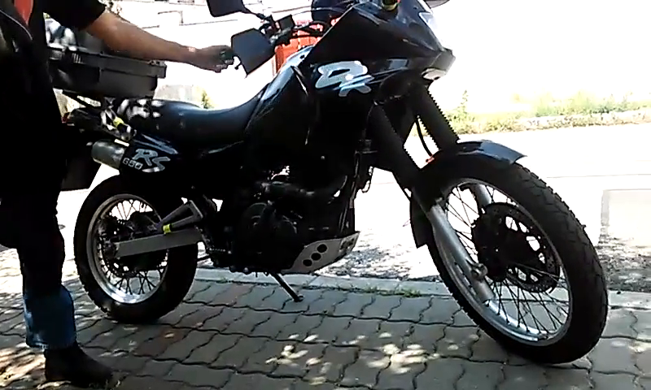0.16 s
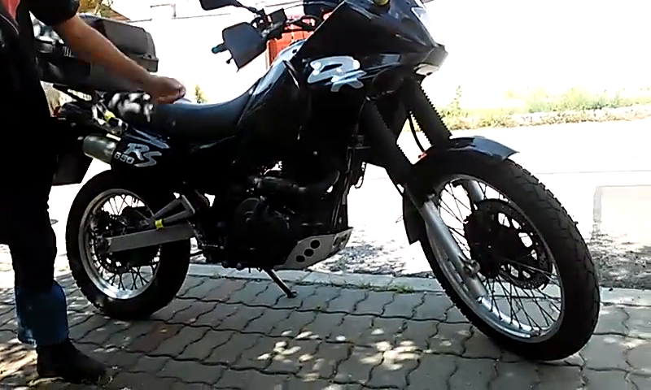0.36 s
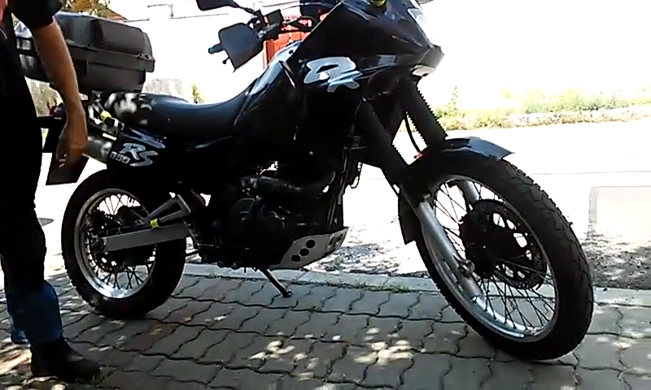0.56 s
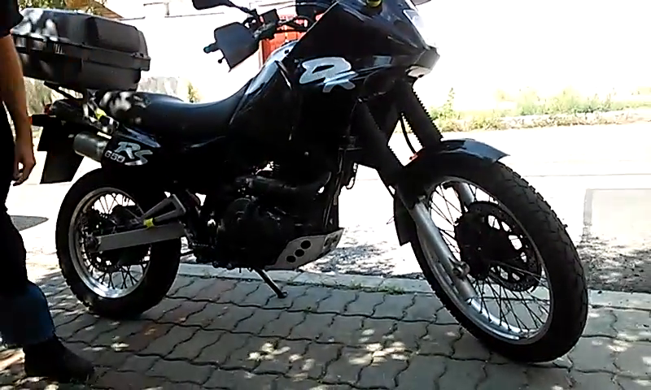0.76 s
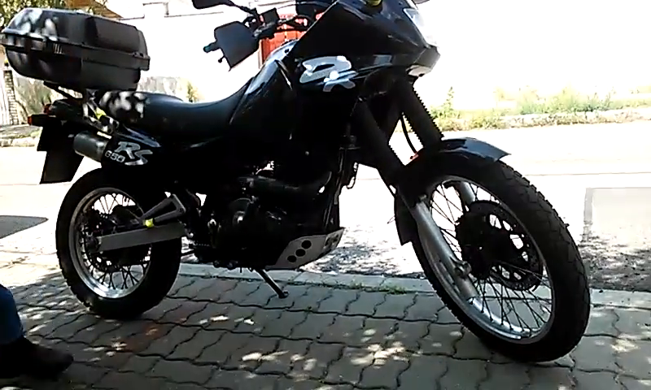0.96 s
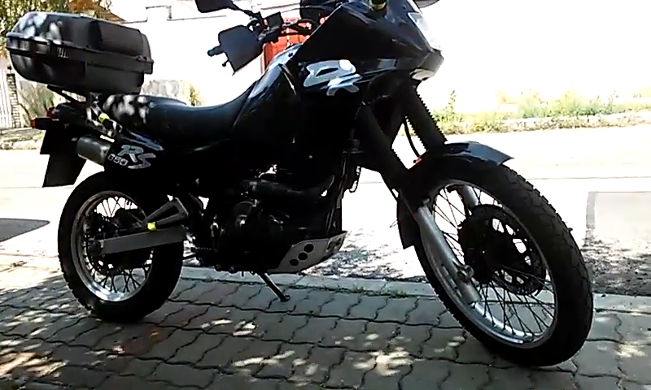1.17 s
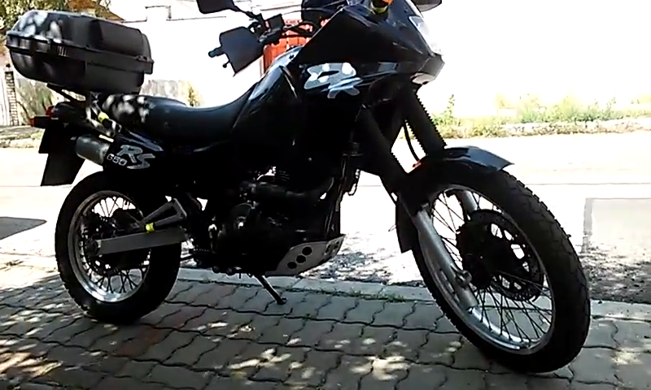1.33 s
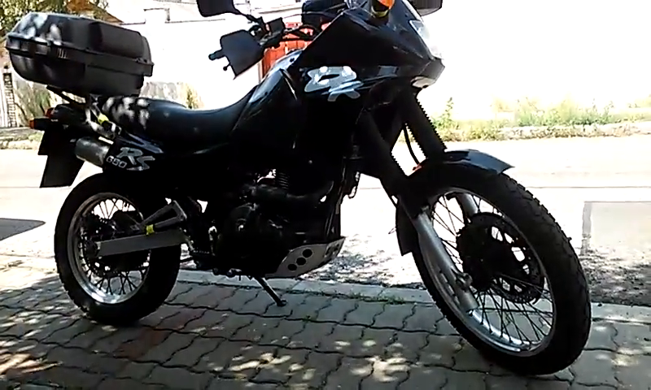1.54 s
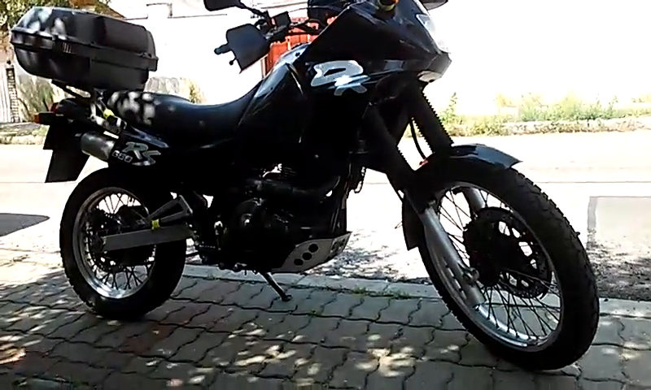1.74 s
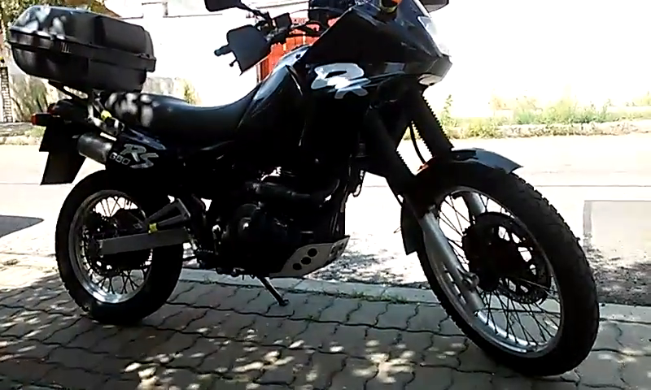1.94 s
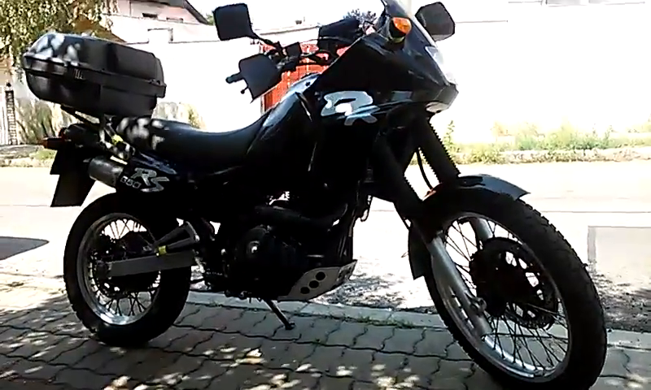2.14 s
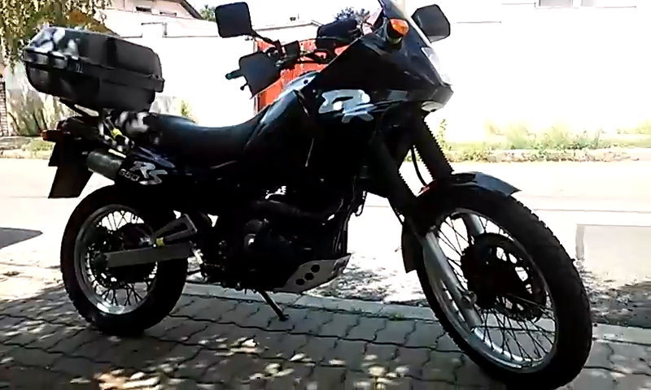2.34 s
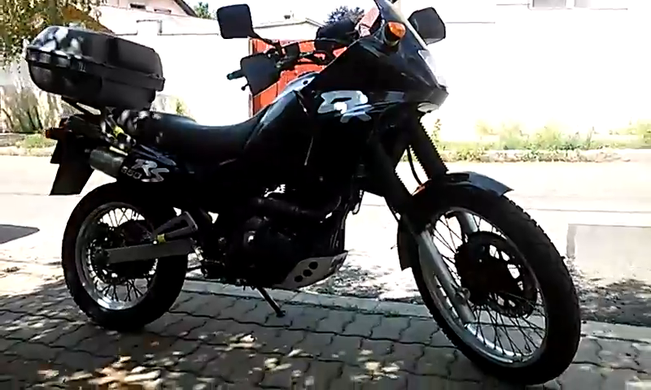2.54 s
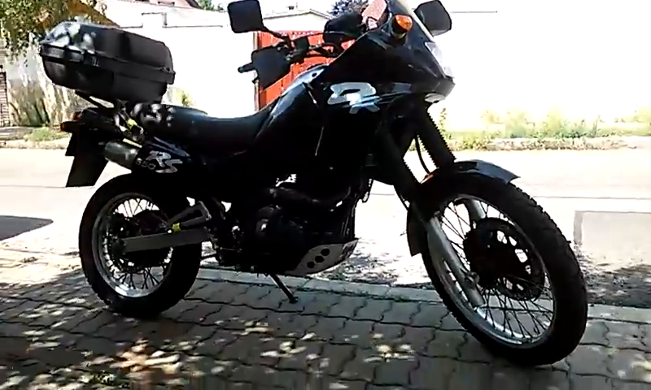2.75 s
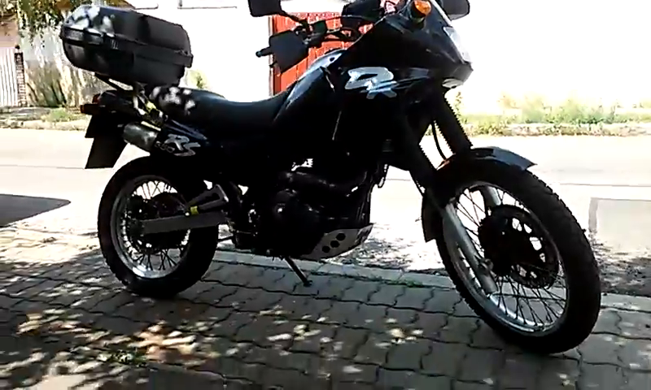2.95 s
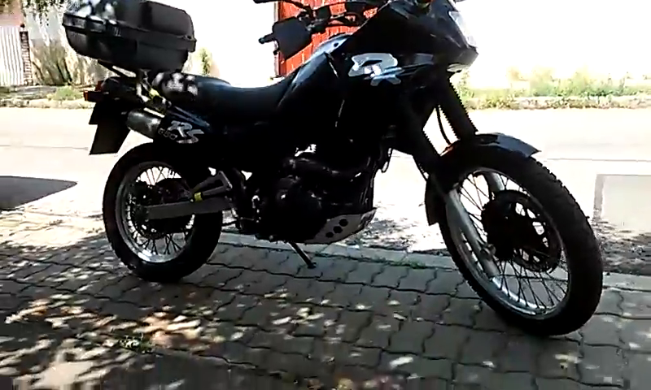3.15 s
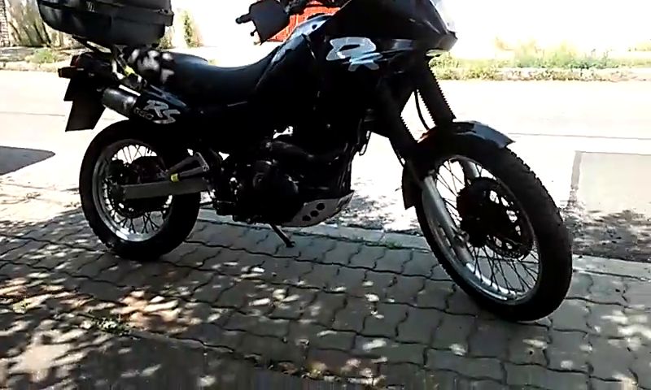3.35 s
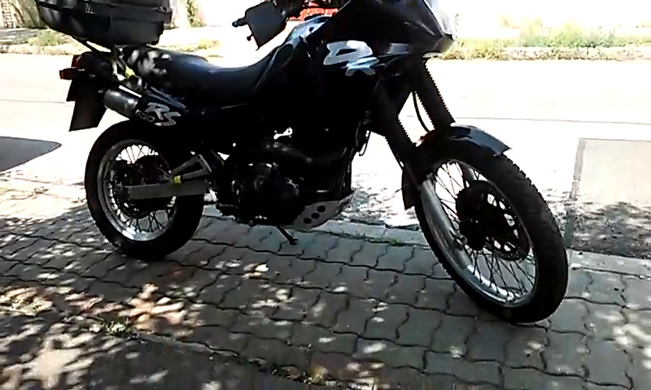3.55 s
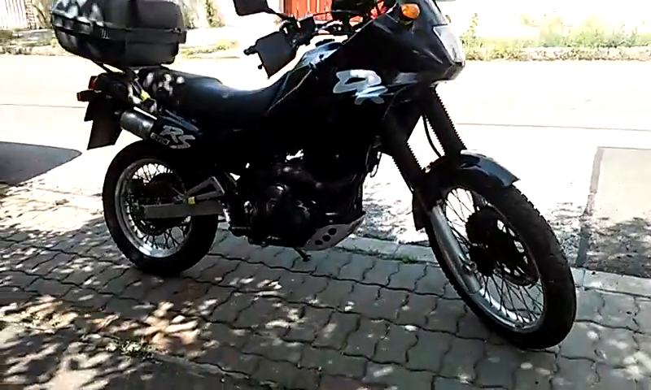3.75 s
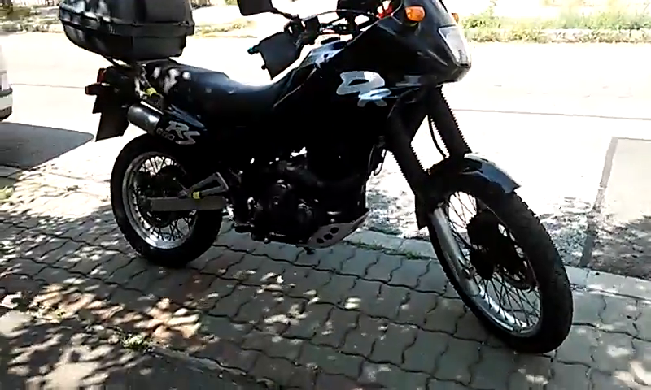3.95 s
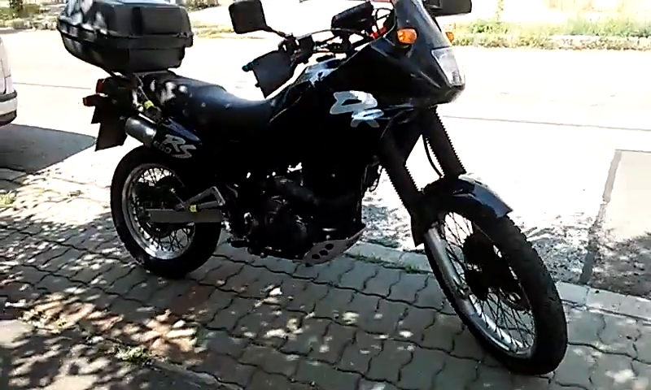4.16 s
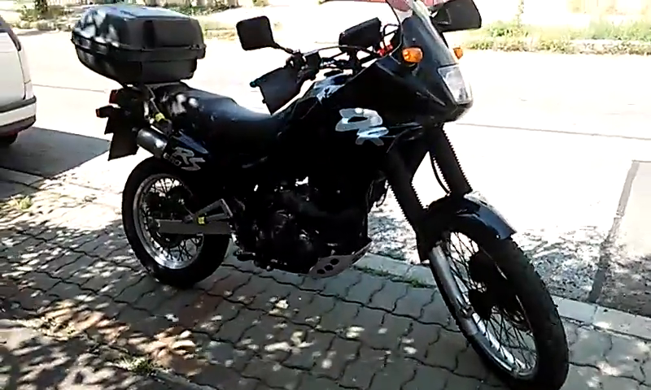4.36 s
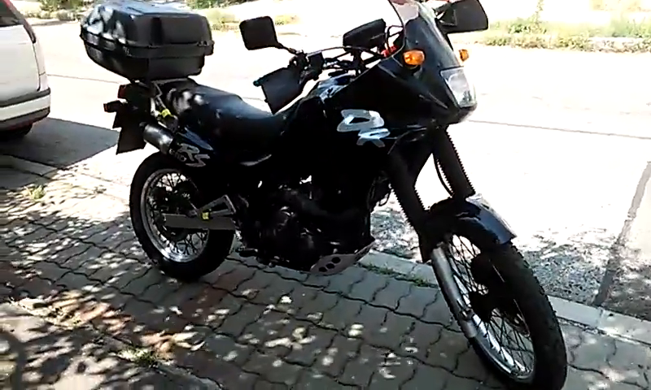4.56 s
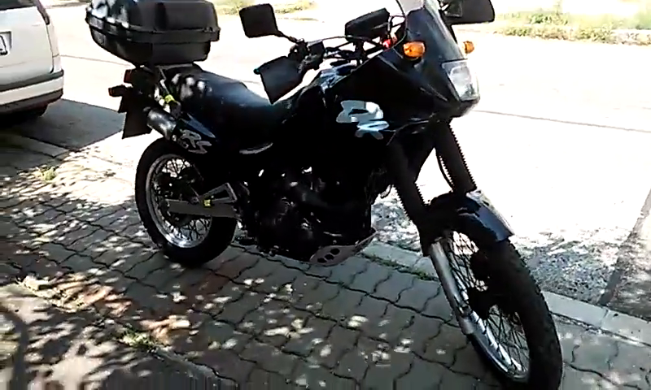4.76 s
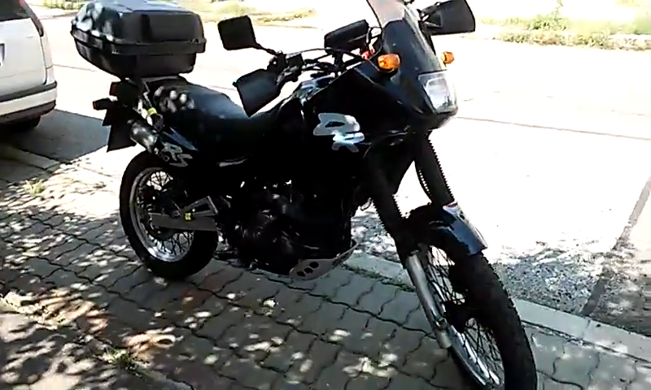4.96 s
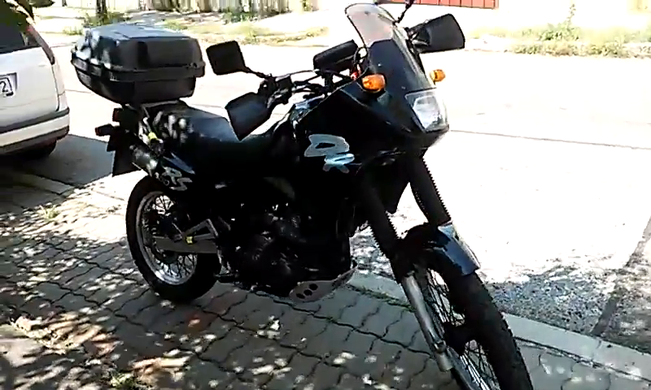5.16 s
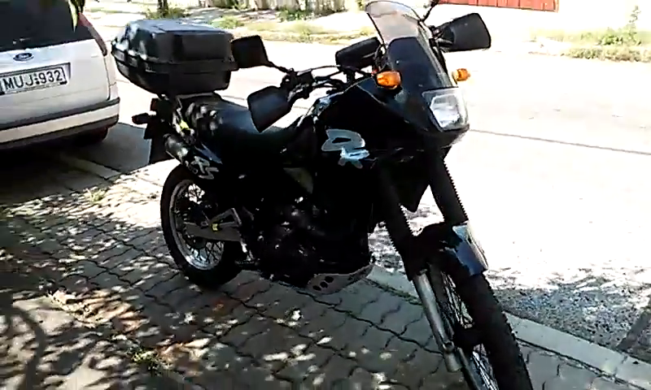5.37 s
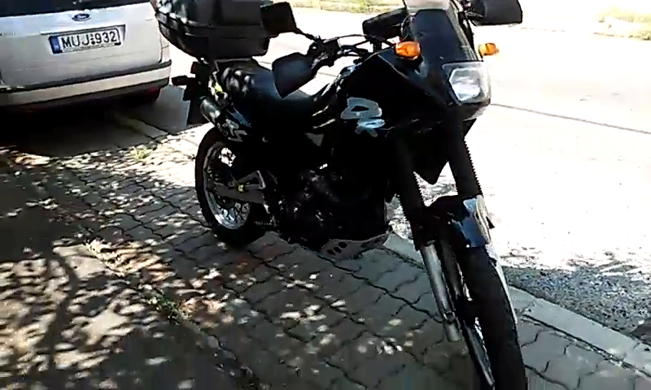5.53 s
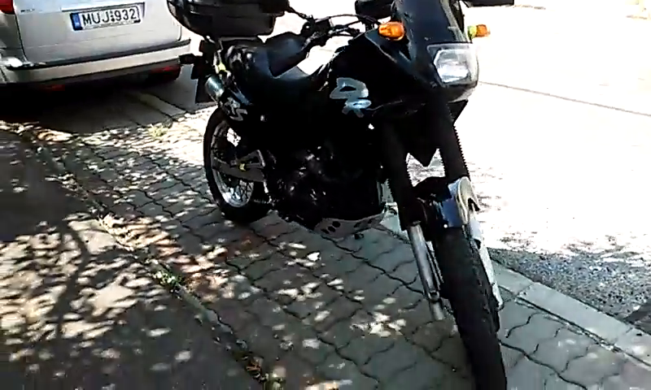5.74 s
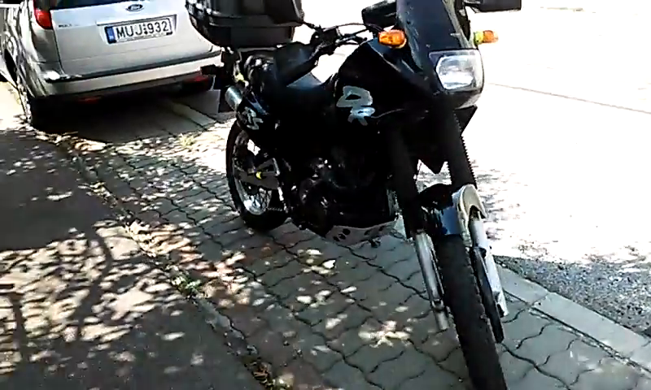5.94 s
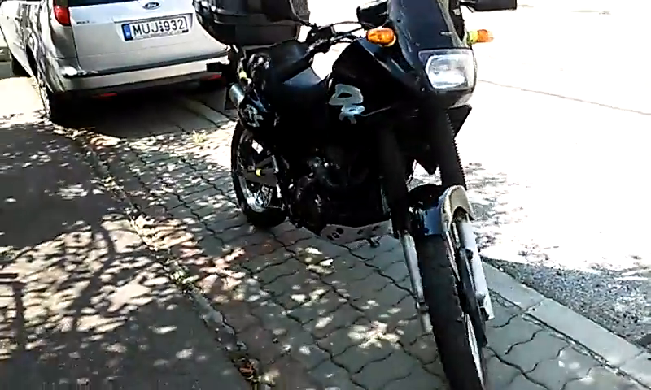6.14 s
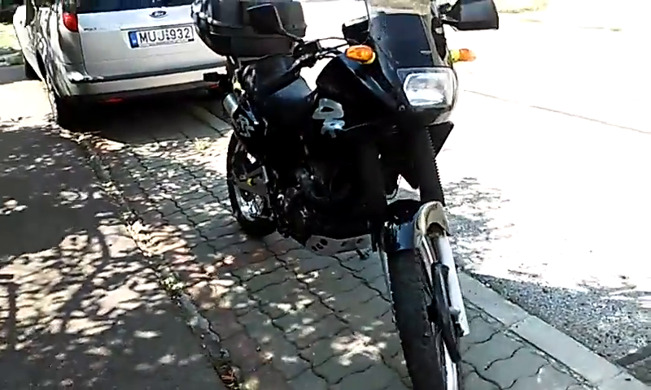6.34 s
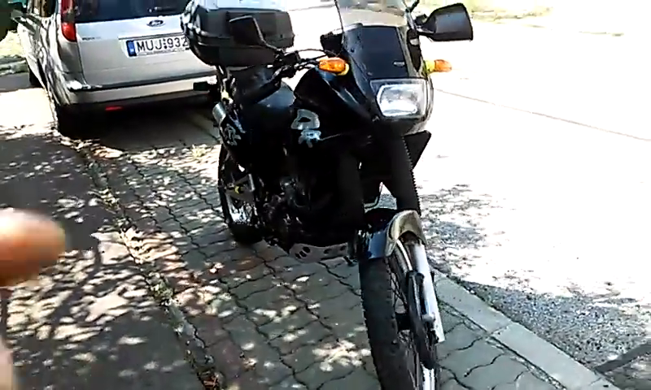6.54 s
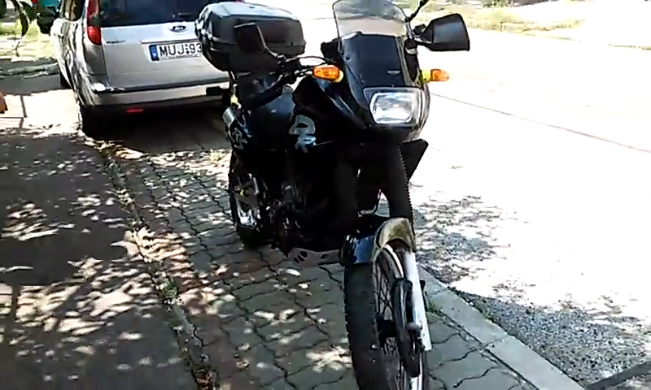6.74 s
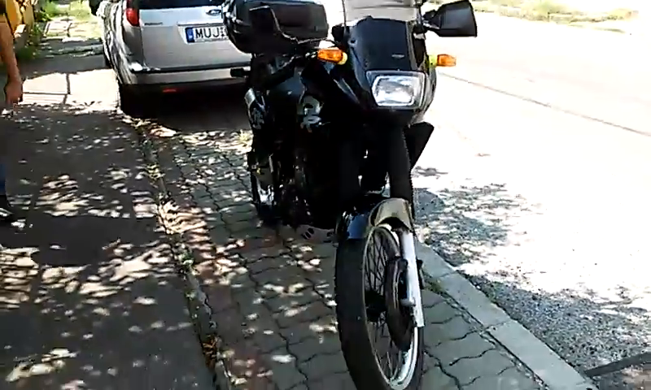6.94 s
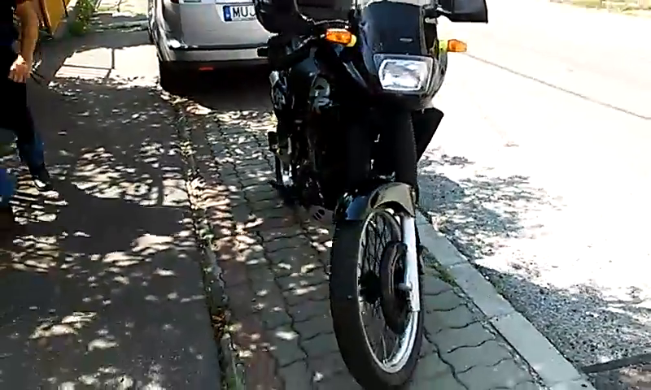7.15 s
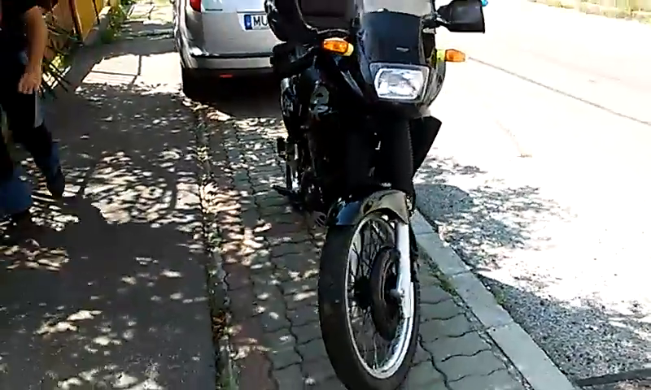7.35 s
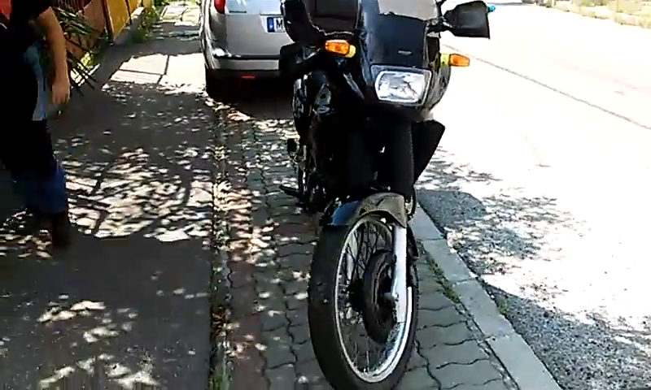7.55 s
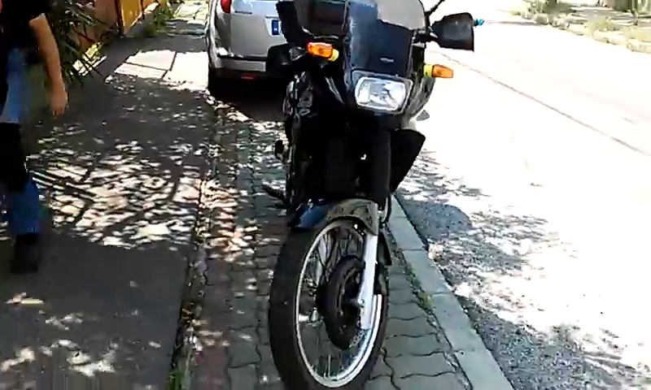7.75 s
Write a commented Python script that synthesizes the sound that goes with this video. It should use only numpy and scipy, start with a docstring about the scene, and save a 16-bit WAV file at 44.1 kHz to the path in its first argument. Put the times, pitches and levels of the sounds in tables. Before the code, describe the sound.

A loud, rough throttle blip opens at once, booms as the throttle shuts, and falls within about a second and a half to a slow single-cylinder idle. Uneven exhaust thumps carry metallic clatter, buzzing covers and small sharp ticks. The close outdoor microphone moves from the motorcycle's flank to its front wheel, so the tone shifts gradually, over faint distant traffic.

```python
"""A throttle blip blares, then a single-cylinder motorcycle falls to idle on a paved street.
Superposition: each firing sends swelling notes down the exhaust and shakes clatter out of the engine cases,
as noise filtered by the metal and as knocked resonators. Tones locked to the engine, ticks, whirrs, a thud
and a far murmur add to it. The microphone walks from the flank to the front wheel; a ground echo combs
the cases and ticks, and its delay shortens late in the walk."""
import sys
import numpy as np
from scipy import signal
from scipy.fft import rfft, irfft, next_fast_len
from scipy.io import wavfile
from scipy.ndimage import uniform_filter1d

SR = 44100
rng = np.random.default_rng(int(sys.argv[2]) if len(sys.argv) > 2 else 0)


def waveform_to_disk(signal):
    """Save audio, clipped to [-1, 1], as 16-bit WAV at the path in sys.argv[1]."""
    frames = np.transpose(np.atleast_2d(signal))
    scaled = np.clip(frames, -1, 1) * 32767
    samples = np.round(scaled).astype(np.int16)
    wavfile.write(sys.argv[1], SR, samples)


N = 343980
T = np.arange(N) / SR  # time of every sample, t/s

# Engine speed; the blip dies away, then the idle hunts a little. Columns: t/s, firing rate f/Hz
FIRING_RATE = [(0.0, 37.9), (0.12, 39.8), (0.25, 34.8), (0.5, 28.8), (0.9, 20.64), (1.3, 17.15),
               (1.7, 15.49), (2.0, 15.31), (2.3, 15.02), (2.6, 15.12), (3.0, 15.27), (3.3, 15.01),
               (3.8, 15.03), (4.8, 14.98), (5.3, 14.58), (6.0, 15.32), (6.4, 14.73), (6.7, 15.33),
               (7.2, 14.96), (7.8, 15.88)]
# Course of throttle and microphone. Columns: t/s, place
# (0 throttle open, 1 throttle shut, 2 flank, 3 shoulder, 4 corner, 5 front wheel)
PLACE_PATH = [(.15, -0.5), (.2, 1), (.9, 1.5), (1.3, 2), (3.1, 3), (3.8, 3), (4.5, 4), (5.5, 4.5),
              (6.1, 4.5)]
# Bursts within one firing, timed for cycles of 50 ms or more.
# Columns: f/Hz, deepest trough after the firing t/ms, rise t/ms, fall t/ms
EXHAUST_BURSTS = [(104, -14.5, 13, 9), (154, 0, 8.5, 11.5), (190, -22, 4, 6), (235, -.5, 8, 4),
                  (280, -20, 5, 7), (275, 4, 8, 16), (350, -18, 6, 12), (420, -17, 5, 9), (424, 5, 16, 28),
                  (1035, -7, 6, 7), (540, -2, 6, 9), (690, -20.7, 2, 6), (905, -20.7, 2, 6),
                  (730, 1, 6, 3.5), (905, 1, 6, 3.5)]
# Strength of each burst, one row a burst. Columns: level/dB at places 0 to 5
BURST_LEVELS = [(-17, -21, -8, -6.5, -2, -2.5), (-16, 1.5, -1, 2.5, 3, -1.5), (1, -3.5, -7, -6.5, -49, 5),
                (-28, -12, -9, -8.5, -13, 6.5), (-17, -11.5, -8.5, -29, -10.5, -4.5),
                (-7.5, -9, -26, -39, -11.5, -24), (-9, -32, -65, -15.5, -3.5, -4),
                (-4, -39, -25, -28, -6, -1), (-8, -17, -28.5, -20.5, -10, -5), (-25, -19, -20, -14, -6, -8),
                (-13, -16, -21, -19, -16, -3), (-6, -10, -5, -5.5, -0.5, -55),
                (-22, -22, -18, -7.5, -22, -20), (-5, -14, -2.5, -18, -32, -25),
                (-18, -28, -11, -2, -9, -20)]
# Pitch of the upper bursts: it jumps as the revs settle, then slides down. Columns: t/s, ratio
UPPER_BURST_PITCH = [(1.15, 0.92), (1.25, 1.07), (1.95, 0.9695)]
# Exhaust loudness; it booms while the throttle is shut, then sags. Columns: t/s, level/dB
EXHAUST_LEVEL = [(0, -27.5), (.15, -23.5), (.2, -15), (.35, -17.5), (.56, -18.5), (.63, -26.5),
                 (.92, -29.5), (1.05, -43), (1.15, -29), (1.7, -28.5), (2.5, -24), (3.8, -25.5),
                 (5.24, -31.5), (5.6, -29), (6.68, -31), (7.42, -30), (7.6, -29)]
# Clean engine tones. Key: multiple of the firing rate. Columns: t/s, level/dB
ENGINE_TONES = {5: [(0, -18), (.12, -24), (.21, -62)], 18: [(5.2, -48), (6.05, -34), (6.4, -43),
                (7.05, -36), (7.4, -35), (7.8, -59)]}
# Noise of the cases: rumble, clatter, rattle, hiss. Columns: low f/Hz, high f/Hz (at most half of SR),
# offset level/dB, throb level/dB, throb peak/cycle, tick share of power (0-1)
NOISE_LAYERS = [(186, 930, 4, 2, -0.035, 0.04), (796, 4900, -5, 4, -0.3, 0.24),
                (4140, 6560, -9, 1, -0.2, 0.16), (6330, 31000, 1, 5, -0.1, 0.09)]
# Broad spectral density of the engine metal. Columns: f/Hz, relative level/dB per Hz
METAL_COLOUR = [(88, -31), (150, -3.5), (297, -7), (415, -4), (494, -0.5), (907, -19.5), (1190, -15.5),
                (1830, -11), (3300, -16), (5370, -18.5), (6790, -26.5), (8800, -36.5), (16100, -45)]
# Resonances of thin fins in the treble. Columns: f/Hz, width f/Hz, gain over the colour level/dB
FIN_RESONANCES = [(7790, 160, 5), (10800, 120, 4.5), (12770, 510, 3.5), (14300, 500, 7)]
# Growth of each noisy layer with the revs. Columns: gain level/dB, start and full firing rate f/Hz
REV_GROWTH = {"rumble": (22.5, 17.8, 43), "clatter": (21.6, 18.76, 33.1), "rattle": (26.2, 17.6, 37.9),
              "hiss": (18.2, 17.3, 32.5)}
# Idle loudness of rumble, clatter and hiss. Columns: level/dB at flank, shoulder, corner, front wheel
IDLE_LEVELS = {"rumble": (-45, -44.5, -42, -36), "clatter": (-31.5, -28.5, -27, -29.5),
               "hiss": (-45.5, -43.5, -45.5, -47)}
# Idle loudness of the treble rattle. Columns: t/s, level/dB
RATTLE_LEVEL = [(1.7, -34), (2.7, -32), (3.08, -28), (3.6, -29), (4.52, -33), (4.88, -28), (5.3, -33.5),
                (5.96, -26), (6.7, -31), (7.04, -35), (7.8, -37.5)]
# The microphone backs away at the end. Columns: t/s, distance/m
MICROPHONE_DISTANCE = [(6.1, 0.83), (7.1, 1.24), (7.8, 1.24)]
# Firings that stand out, hard or feeble. Columns: t/s, level/dB before the layer's share
ODD_FIRINGS_DB = [(1.099, -2), (1.321, 2.5), (1.625, 2), (3.136, -3.5), (4.867, 1.5), (5.206, 2),
                  (6.677, 4), (7.138, -3), (7.271, -3.5), (7.663, -1)]
# Factor on the odd firings, by layer [ratio]
ODD_FIRING_SHARE = {"rumble": 0.28, "clatter": 0.7, "rattle": 1, "hiss": 1.8}
# Valve-gear knocks, two a cycle. Columns: place/cycle, jump level/dB and dying time/cycle,
# scatter level/dB; levels are for idle, before the layer's share
VALVE_KNOCKS = [(-.44, 5, 0.089, 4), (-.04, 5.5, 0.17, 4.5)]
# Factor on the valve knocks, by layer [ratio]
VALVE_KNOCK_SHARE = {"rumble": 0, "clatter": 0.56, "rattle": 1, "hiss": 0.45}
# Resonant covers and panels, each loudest where it faces the microphone.
# Columns: f/Hz, nominal width f/Hz (widened in ringing), level/dB against the clatter at places 0 to 5
PANEL_RINGS = [(757, 69, -9.5, -15, -10.5, -6, -20.5, -59), (911, 68, -17.5, -31, -6, -18, -4, -20.5),
               (1038, 92, -23, -23, -11.5, -16, -8.5, -5.5), (1318, 96, -34, -20, -22, -6, -23, -5),
               (1498, 104, -11.5, -7.5, -5, -14, -33, -38), (1633, 29, -10, -10.5, -13, -41, -33, -7.5),
               (1812, 88, -5, -5.5, -4, -7, -3.5, -21.5), (2037, 113, -8, -10, -54, -5, -7, -11),
               (2160, 50, -24, -48, -39, -19, -11, -7), (2363, 114, -4.5, -8.5, -9, -16.5, -10, -10.5),
               (2654, 194, -8.5, -13, -9, -7.5, -10.5, -37), (3096, 31, -13, -22, -21, -40, -40, -21.5),
               (3757, 61, -11, -20, -15.5, -16, -23, -31)]
# Small covers that buzz. Columns: as PANEL_RINGS, with level/dB against the rattle
BUZZING_COVERS = [(4774, 190, -7, -7.5, -4, -8.5, -13.5, -12), (5110, 76, -8, -8.5, -12.5, -7.5, -43, -4.5),
                  (5506, 110, -9.5, -9, -6, -17, -11.5, -7.5), (5746, 79, -18, -16, -14, -10.5, -9.5, -14),
                  (5280, 150, -12, -8.5, -6.5, -8, -8, -9.5)]
# Pitch of the buzzing covers: it sinks, then leaps as the microphone rounds the tank. Columns: t/s, ratio
COVER_PITCH = [(2.65, 1.04), (2.85, 0.99), (3.15, 1.01), (3.25, 1.05), (4.2, 0.99)]
# Echo by the paving. Columns: t/s, extra path t/ms, strength (0-1)
PAVING_ECHO = [(1.2, 0.91, 0.42), (3.5, 0.91, 0.63), (4.3, 0.97, 0), (5.0, 0.82, 0.34), (7.8, 0.33, 0.01)]
# Sharp metallic ticks. Columns: t/s, level/dB, f/Hz
METAL_TICKS = [(0.8407, -12.5, 5600), (1.191, -22.5, 950), (1.731, -24, 1960), (1.803, -17.5, 2040),
               (2.6622, -13.5, 2550), (3.1742, -24, 1950), (3.5063, -16.5, 2690), (4.303, -22, 1720),
               (4.371, -16, 1836), (4.862, -15, 5400), (6.1768, -13.5, 5380), (6.4727, -17, 5370),
               (7.0377, -16, 1665), (7.502, -22, 2040)]
# Singing narrow bands, by name: width f/Hz, then a path. Columns of the path: t/s, f/Hz, level/dB
SINGING_BANDS = {"whirr at the corner": (69, [(3.7, 1870, -43), (4.0, 1838, -29.5), (4.3, 1793, -40),
                 (4.5, 1784, -33), (4.62, 1894, -28), (5.1, 1850, -72)]),
                 "bright whirr past the corner": (170, [(4.7, 2760, -57), (5.0, 2870, -35.5),
                 (5.3, 2820, -35), (5.6, 2800, -44)])}
# Dull low thud. Columns: t/s, spread t/s, level/dB, low f/Hz, high f/Hz
LOW_THUD = (7.42, 0.05, -27, 110, 400)

FIRST_TURN = .25  # part of a cycle before the first firing
OVERRUN_ROUGH = 2  # added roughness of the firings when the throttle is fully shut
UPPER_HZ = 600  # bursts above this follow UPPER_BURST_PITCH
REV_BEND = 0.73  # exponent of loudness growth with revs
ODD_EARLY_S, ODD_SPREAD_S = 0.0018, 0.021  # lead and spread of an odd firing's level change
STREET_DB = -38  # distant traffic
EDGE_HZ = 15770  # upper band limit


def gain_of(db):
    """Level: twenty decibels make a factor of ten in amplitude."""
    return 10 ** (np.asarray(db) / 20)


def evened(x):
    """Normalisation: unit root-mean-square amplitude over the whole signal."""
    return x / np.sqrt(np.mean(x ** 2) + 1e-20)


def levelled(x):
    """Running normalisation: division by the short-term RMS takes out slow changes of level."""
    power = uniform_filter1d(uniform_filter1d(x ** 2, SR // 4), SR // 4)
    return x / np.sqrt(power + 1e-20)


def curve(rows, axis):
    """Linear interpolation: one column of a table, read at every sample."""
    rows = np.asarray(rows)
    return np.interp(T, rows[:, 0], rows[:, axis])


def add(mix, s, sound):
    """Superposition: adds a sound into the mix from time s, cut at the ends of the mix."""
    at = round(s * SR)
    sound = sound[max(-at, 0):]
    part = mix[max(at, 0):][:len(sound)]
    part += sound[:len(part)]


def band(hz, lo_hz, hi_hz):
    """Power-complementary bands: soft-edged neighbours sum to one in power."""
    return np.sqrt(1 / (1 + (hz / hi_hz) ** 12) - 1 / (1 + (hz / lo_hz) ** 12))


def filtered(x, gain):
    """Linear filtering: multiplies the spectrum by a gain given as a function of frequency."""
    size = next_fast_len(N + 4096)
    return irfft(rfft(x, size) * gain(np.fft.rfftfreq(size, 1 / SR)), size)[:N]


def firings():
    """Phase accumulation: a firing occurs each time the integrated rate passes a whole cycle."""
    t = np.arange(N + SR // 8) / SR
    turns = np.cumsum(np.interp(t, *np.transpose(FIRING_RATE))) / SR - FIRST_TURN
    return np.interp(np.arange(int(turns[-1]) + 1), turns, t)


def throbbing(depth_db, peak, uneven_db):
    """Amplitude modulation: a gain swells once a firing, by a different amount each time."""
    s = firings()
    cycle = np.interp(T, s, np.arange(len(s))) - peak
    # fast firings run together, so the swell flattens
    slow = np.clip(np.interp(T, s, np.gradient(s)) / 0.045, 0, 1) ** 2
    blow_db = uneven_db * np.clip(rng.standard_normal(len(s) + 2), -2, 2)
    swell_db = depth_db + blow_db[np.round(cycle).astype(int)]
    shape = np.exp(1.2 * (np.cos(2 * np.pi * cycle) - 1))
    return gain_of(slow * shape * swell_db)


def knocking():
    """Impact and decay: a level in dB jumps at each valve knock and dies away."""
    s = firings()
    cycle, out = np.interp(T, s, np.arange(len(s))), 0
    for place, jump_db, dying, scatter_db in VALVE_KNOCKS:
        late, size = rng.standard_normal((len(s) + 2, 2)).clip(-2, 2).T
        since = cycle - place + 0.0098 * late[np.round(cycle - place).astype(int)]
        knock_db = jump_db + scatter_db * size[since.astype(int)]
        out = out + knock_db * np.exp(-(since % 1) / dying)
    return out * np.clip(np.interp(T, s, np.gradient(s)) / 0.065, 0, 1)  # weaker at fast firing


def loudness(layer):
    """Source strength and position: revs and odd firings raise or lower the layer's idle level."""
    rev_db, start, full = REV_GROWTH[layer]
    revs = np.clip((curve(FIRING_RATE, axis=1) - start) / (full - start), 0, 1) ** REV_BEND
    odd_db = sum(db * np.exp(-.5 * ((T - s + ODD_EARLY_S) / ODD_SPREAD_S) ** 2) for s, db in ODD_FIRINGS_DB)
    lift_db = rev_db * revs + ODD_FIRING_SHARE[layer] * odd_db
    if layer == "rattle":
        return gain_of(curve(RATTLE_LEVEL, axis=1) + lift_db)
    idle_db = np.interp(curve(PLACE_PATH, axis=1), range(2, 6), IDLE_LEVELS[layer])
    # pressure falls as one over distance
    return gain_of(idle_db + lift_db) * MICROPHONE_DISTANCE[0][1] / curve(MICROPHONE_DISTANCE, axis=1)


def exhaust():
    """Pulse excitation: every firing plays the same bursts; higher ones scatter more in time and size."""
    out, s = np.zeros(N), firings()
    place = np.interp(s, *np.transpose(PLACE_PATH))
    pitch = np.interp(s, *np.transpose(UPPER_BURST_PITCH))
    squeeze = np.minimum(np.gradient(s) / .05, 1)  # bursts crowd together when the cycle is short
    rough = 1 + OVERRUN_ROUGH * np.clip(1 - abs(place - 1), 0, 1)
    late_ms = .1 * rough ** 3 * rng.standard_normal(len(s))
    strength_db = 0.74 * rough * rng.standard_normal(len(s))
    for (hz, trough, rise, fall), place_db in zip(EXHAUST_BURSTS, BURST_LEVELS):
        chance = hz / 12000 * rough[:, None] * rng.standard_normal((len(s), 2))
        level = gain_of(np.interp(place, range(6), place_db) + strength_db + 10 * chance[:, 1])
        for k, short in enumerate(squeeze ** .5):
            ms = np.arange(-3 * rise * short, 3 * fall * short, 1000 / SR)
            shape = np.exp(-.5 * (ms / (short * np.where(ms < 0, rise, fall))) ** 2)
            ratio = pitch[k] if hz > UPPER_HZ else 1
            wave = -np.cos(2 * np.pi * hz * ratio * ms / 1000)
            delay_ms = trough * squeeze[k] + late_ms[k] + chance[k, 0] + ms[0]
            add(out, s[k] + delay_ms / 1000, level[k] * shape * wave)
    return gain_of(curve(EXHAUST_LEVEL, axis=1)) * levelled(out)


def tones():
    """Harmonic synthesis: sines locked to the engine speed swell unevenly with the firings."""
    turn = 2 * np.pi * np.cumsum(curve(FIRING_RATE, axis=1)) / SR
    sines = 0
    for multiple, path in ENGINE_TONES.items():
        sines = sines + gain_of(curve(path, axis=1)) * np.sqrt(2) * np.sin(multiple * turn)
    return evened(throbbing(depth_db=3.5, peak=0, uneven_db=2.5)) * sines


def metal(hz):
    """Transfer function: the broad colour of the engine carries the fin resonances on top."""
    f, db = np.transpose(METAL_COLOUR)
    fins = sum((gain_of(g) - 1) / (1 + 2j * (hz - at) / w) for at, w, g in FIN_RESONANCES)
    return gain_of(np.interp(np.log(hz + 1), np.log(f), db)) * (1 + fins)


def cases():
    """Source and filter: throbbing noise and small ticks pass through the metal, each band apart."""
    flutter = uniform_filter1d(uniform_filter1d(rng.standard_normal(N), 200), 200)
    flutter_db = 1.4 * evened(flutter)
    out, valves_db = np.zeros(N), knocking()
    uneven = throbbing(depth_db=1, peak=-0.018, uneven_db=1.0)
    for name, (lo_hz, hi_hz, offset_db, throb_db, peak, share) in zip(REV_GROWTH, NOISE_LAYERS):
        share = np.clip(share, 0, 1)
        edges, layer = np.geomspace(lo_hz, min(hi_hz, SR / 2), num=3), 0
        for low, high in zip(edges, edges[1:]):
            sizes = gain_of(4.0 * np.minimum(rng.exponential(1, N), 2))
            struck = rng.random(N) < 900 / SR  # 900 small ticks per second on average
            grains = evened(sizes * struck * rng.choice([-1, 1], N))
            drive = np.sqrt(1 - share) * rng.standard_normal(N) + np.sqrt(share) * grains
            drive = drive * gain_of(flutter_db) * uneven * throbbing(throb_db, peak, uneven_db=3.0)
            # half the knock scatter is shared by all bands, half is the band's own
            drive = drive * gain_of(VALVE_KNOCK_SHARE[name] * (valves_db + knocking()) / 2)
            layer = layer + filtered(drive, lambda hz: metal(hz) * band(hz, low, high))
        out += loudness(name) * gain_of(offset_db) * evened(layer)
    return out


def paving(x):
    """Interference: a delayed, dulled echo off the ground combs the sound."""
    delay = curve(PAVING_ECHO, axis=1) * SR / 1000
    late = np.interp(np.arange(N) - delay, np.arange(N), x)
    late = signal.lfilter([.3], [1, -.7], late)
    strength = curve(PAVING_ECHO, axis=2)
    return (x + strength * late) / np.sqrt(1 + strength ** 2 / 2)


def ringing(parts, layer, valves_db, pitch, throb_db):
    """Damped resonance: each part rings under its own loose blows, strongest around the firing."""
    out, place = np.zeros(N), curve(PLACE_PATH, axis=1)
    for hz, width, *place_db in parts:
        blows = np.zeros(N)
        blows[rng.integers(0, N, 6000)] = rng.standard_normal(6000)
        blows *= throbbing(depth_db=throb_db, peak=-0.16, uneven_db=3.0)
        blows *= gain_of(VALVE_KNOCK_SHARE[layer] * valves_db)
        pole = np.exp(-np.pi * 1.9 * width / SR)  # widened, as a double pole narrows the peak
        turn = np.exp(2j * np.pi * hz * np.cumsum(pitch) / SR)
        ring = (turn * signal.lfilter([1], [1, -2 * pole, pole ** 2], blows / turn)).real
        out += gain_of(np.interp(place, range(6), place_db)) * evened(ring)
    return loudness(layer) * out


def street():
    """Band-limited noise: a low, steady murmur of far traffic."""
    murmur = filtered(rng.standard_normal(N), lambda hz: band(hz, 64, 313))
    return gain_of(STREET_DB) * evened(murmur)


def whirr():
    """Heterodyning: narrow noise rides a bending pitch, held before its path starts, silent after it."""
    out = np.zeros(N)
    for width, path in SINGING_BANDS.values():
        pole = np.exp(-np.pi * width / SR)
        a, b = signal.lfilter([1], [1, -2 * pole, pole ** 2], rng.standard_normal((2, N)))
        turn = 2 * np.pi * np.cumsum(curve(path, axis=1)) / SR
        strip = evened(a * np.cos(turn) + b * np.sin(turn))
        throb = evened(throbbing(depth_db=5, peak=0, uneven_db=3.5))
        out += gain_of(curve(path, axis=2)) * (T <= path[-1][0]) * throb * strip
    return out


def ticks():
    """Impulsive contact: each tick is a short ring, a puff of clatter and a bright spit."""
    out, t = np.zeros(N), np.arange(1500) / SR
    for s, db, hz in METAL_TICKS:
        puff, spit = rng.standard_normal((2, len(t)))
        # each part decays by 60 dB over the time it is divided by, in s
        ring = np.sin(2 * np.pi * hz * t) * gain_of(-60 * t / 0.064)
        puff = signal.lfilter(*signal.butter(2, [1300, 6000], "band", fs=SR), puff) * gain_of(-60 * t / 0.44)
        spit = signal.lfilter(*signal.butter(2, 6500, "high", fs=SR), spit) * gain_of(-60 * t / 0.015)
        onset = 1 - np.exp(-t / 0.00019)
        add(out, s, gain_of(db) * (ring + 0.15 * puff + .04 * spit) * onset)
    return out


def thud():
    """Gaussian envelope: a short swell of low noise."""
    s, spread, db, lo_hz, hi_hz = LOW_THUD
    low = filtered(rng.standard_normal(N), lambda hz: band(hz, lo_hz, hi_hz))
    return gain_of(db) * np.exp(-.5 * ((T - s) / spread) ** 2) * evened(low)


def scene():
    """Superposition: all sources sum at the microphone; the echo acts on the cases and ticks."""
    panels = ringing(PANEL_RINGS, "clatter", knocking(), np.ones(N), throb_db=7.0)
    covers = ringing(BUZZING_COVERS, "rattle", knocking(), curve(COVER_PITCH, axis=1), throb_db=6.0)
    engine = exhaust() + tones() + panels + covers + paving(cases() + ticks())
    return (engine + street() + whirr() + thud())[None]


def record(dry):
    """Transduction: the microphone drops deep bass and clips beyond full scale; then the band limit."""
    thin = signal.sosfilt(signal.butter(2, 60, "high", fs=SR, output="sos"), dry)
    lowpass = signal.firwin(2047, EDGE_HZ, window=("kaiser", 12), fs=SR)
    return signal.oaconvolve(np.clip(thin, -1, 1), lowpass[None], "same")


dry = scene()
out = record(dry)
waveform_to_disk(out)
```